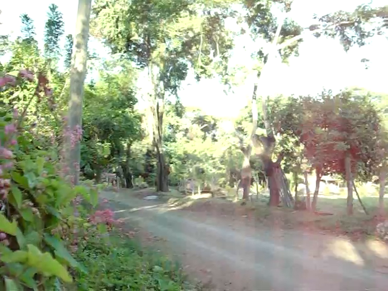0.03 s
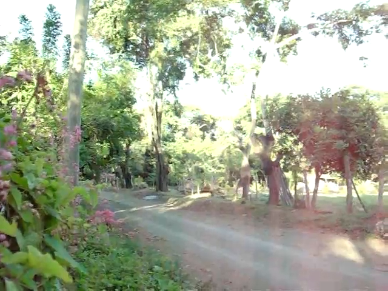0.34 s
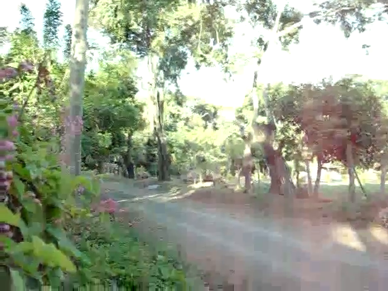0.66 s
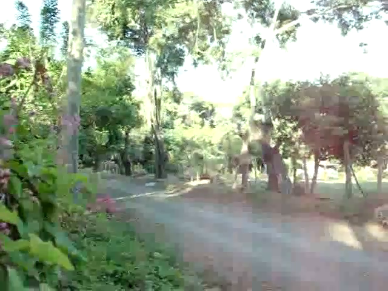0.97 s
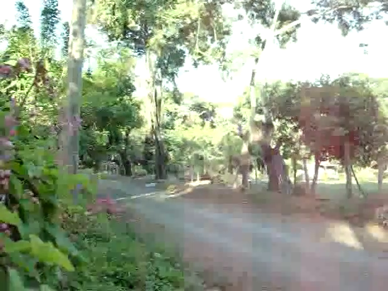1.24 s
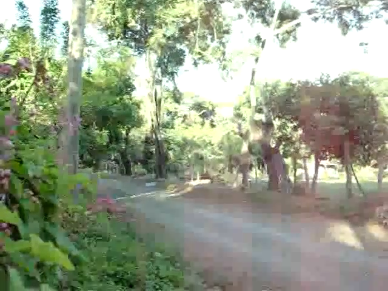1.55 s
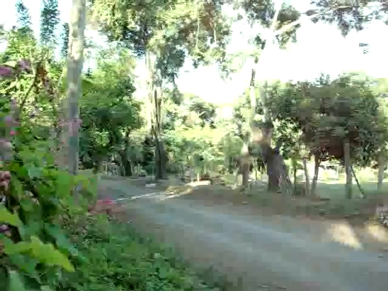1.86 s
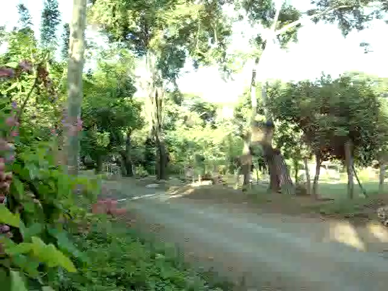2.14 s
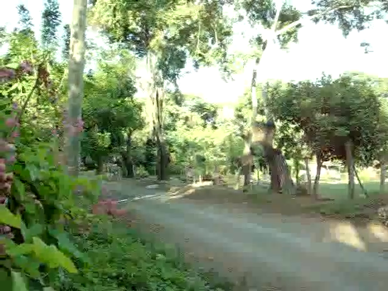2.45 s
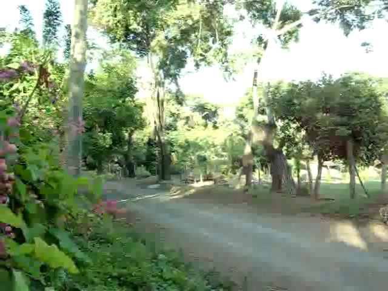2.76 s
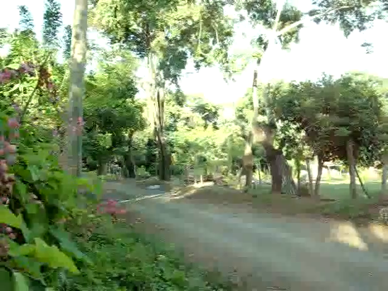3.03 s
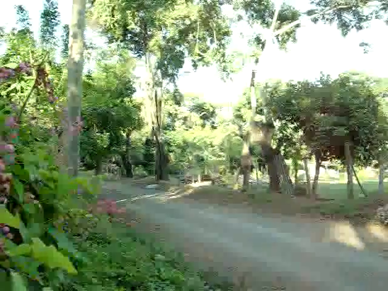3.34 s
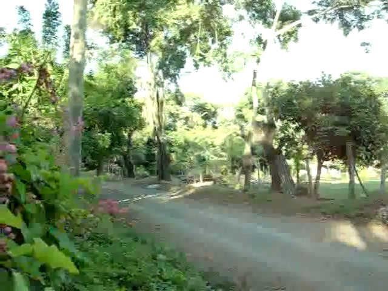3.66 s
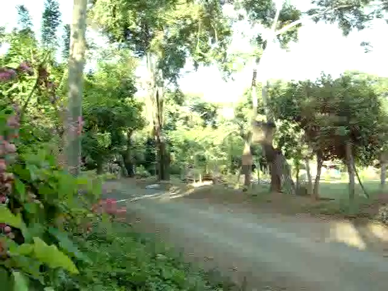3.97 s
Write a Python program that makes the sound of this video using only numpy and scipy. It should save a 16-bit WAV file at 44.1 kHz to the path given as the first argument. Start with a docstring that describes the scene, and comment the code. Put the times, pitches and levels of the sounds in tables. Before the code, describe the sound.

Howler monkeys roar far off in the forest from the start, rasping and pulsing, with short falling hoots near 0.5, 1 and 1.4 seconds, fading out by 2 seconds. Fingers click on the camera's case between 0.6 and 1 second, and one loud knock lands at 1.8 seconds. Low outdoor noise, a wavering hum and a faint whine and hiss continue until the end, around 4 seconds.

```python
"""Howler monkeys roar far off in the forest beside a dirt road: a rasp through gliding throat resonances,
with three falling hoots, sinking to a faint murmur by two seconds. Under it all lie the outdoor wash,
a wavering low hum, and the camera's own whine and hiss. From 0.6 s fingers knock and click on the
camera's case; its gain control ducks on the loud knocks and creeps back."""
import sys
import numpy as np
from scipy import signal
from scipy.fft import rfft, irfft
from scipy.io import wavfile
from scipy.ndimage import uniform_filter1d

SR = 44100
rng = np.random.default_rng(int(sys.argv[2]) if len(sys.argv) > 2 else 0)


def wav_record(signal):
    """Record a signal, one row per channel, as 16-bit PCM in the file named by sys.argv[1]."""
    frames = np.transpose(np.atleast_2d(signal))
    bounded = np.clip(frames, -1, 1)
    # unit amplitude maps onto the largest positive 16-bit level
    quanta = np.round(bounded * 32767).astype(np.int16)
    wavfile.write(sys.argv[1], SR, quanta)


N = 176400
T = np.arange(N) / SR
BIN_HZ = np.fft.rfftfreq(N, 1 / SR)


def amp(db):
    return 10 ** (np.asarray(db) / 20)


def unit(x):
    return x / np.sqrt(np.mean(x ** 2) + 1e-20)


def add(mix, start_s, sound):
    part = mix[round(start_s * SR):][:len(sound)]
    part += sound[:len(part)]


def fade(t, t60_s):
    return np.exp(-np.log(1000) * t / t60_s)


def phase(hz):
    return 2 * np.pi * np.cumsum(hz * np.ones(N)) / SR


def white():
    return rng.standard_normal(N)


def noise(spectrum):
    """Steady noise at unit level, shaped by (freq_hz, level_db) points."""
    hz, db = np.transpose(spectrum)
    shape_db = np.interp(np.log(BIN_HZ + 1), np.log(hz + 1), db)
    return unit(irfft(rfft(white()) * amp(shape_db), N))


def waver(hz, depth, rate_hz):
    """Phase of a pitch that wanders at random by the fraction depth, no faster than rate_hz."""
    drift = unit(irfft(rfft(white()) * (BIN_HZ < rate_hz), N))
    return phase(hz * (1 + depth * drift))


def resonate(x, hz, width_hz):
    """A steep resonance that follows the curve hz, at unit level."""
    carrier = np.exp(1j * phase(hz))
    pole = np.exp(-2 * np.pi * width_hz / SR)
    band = x / carrier
    for _ in range(3):  # three passes narrow the band to about width_hz
        band = signal.lfilter([1 - pole], [1, -pole], band)
    return unit((carrier * band).real)


def sustained(x, size=3000):
    """Keeps a sound's quick roughness but holds its loudness steady."""
    power = uniform_filter1d(uniform_filter1d(x ** 2, size), size)
    return x / np.sqrt(abs(power) + 1e-12)


def low_pass(x, hz):
    return signal.oaconvolve(x, signal.firwin(255, hz, window=("kaiser", 8), fs=SR), "same")


# The roar's two gliding resonances and its body: time_s, low_hz, high_hz, low_db, high_db, body_db
ROAR_CURVES = [(.05, 380, 830, -24.5, -21, -27.5), (.13, 390, 825, -25.5, -23.5, -23),
               (.21, 392, 785, -20.5, -17, -23), (.28, 385, 830, -25.5, -22.5, -25),
               (.40, 398, 805, -24.5, -21.5, -22), (.46, 400, 816, -37.5, -27, -28.5),
               (.53, 375, 804.7, -24, -29, -28.5), (.62, 375, 805, -30.5, -24, -23.5),
               (.705, 390, 812.3, -30, -27, -26.5), (.74, 390, 815, -24, -18, -29),
               (.82, 378, 765, -30.5, -29.5, -24), (0.902, 368, 730, -23, -24, -33),
               (.98, 410, 745, -36.5, -27, -26), (1.04, 398, 765, -21.5, -25.5, -25.5),
               (1.11, 415, 810, -33.5, -26.5, -27.5), (1.20, 405, 798, -26, -27, -29),
               (1.35, 402, 810, -28, -30, -29), (1.43, 440, 795, -38.5, -35.5, -36.5),
               (1.59, 440, 794.6, -40, -39.5, -39.5), (1.67, 425, 797, -31.5, -32.5, -36.5),
               (1.80, 418, 780, -33, -35.5, -41), (1.92, 415, 754, -50, -50.5, -43.5)]
# Weaker, still throat resonances that make the body: centre_hz, width_hz, relative_db
THROAT_BODY = [(475, 70, -6), (555, 90, -5), (660, 130, -7), (885, 110, -7), (1390, 100, -19)]


def roar():
    """Rasping puffs of air drive two gliding throat resonances, each with a wavering tone inside."""
    time_s, *curves = np.transpose(ROAR_CURVES)
    low_hz, high_hz, low_db, high_db, body_db = (np.interp(T, time_s, curve) for curve in curves)
    fold_flutter = waver(hz=45.8, depth=.193, rate_hz=40)
    puffs = ((1 + np.cos(fold_flutter)) / 2) ** 2
    breath = (.99 + puffs) * white()  # the puffs ride on a steady airflow
    low = resonate(breath, low_hz, width_hz=46.7)
    low += unit(np.sin(waver(low_hz, depth=.02, rate_hz=45)))
    high = resonate(breath, high_hz, width_hz=87)
    high += amp(-3) * unit(np.sin(waver(high_hz, depth=.02, rate_hz=46.4)))
    body = sum(amp(db) * resonate(white(), hz, width_hz) for hz, width_hz, db in THROAT_BODY)
    return amp(low_db) * sustained(low) + amp(high_db) * sustained(high) + amp(body_db) * body


def forest(calls, tails=4, t60_s=.3, wet_db=-12.5, cycle_hz=2):
    """A short forest reverb; several tails take turns so it adds no fixed colour."""
    t, wet = T[:SR // 2], 0
    for k in range(tails):
        tail = rng.standard_normal(len(t)) * fade(t, t60_s)
        send = np.maximum(np.cos(2 * np.pi * (cycle_hz * T + k / tails)), 0)
        wet += signal.fftconvolve(calls * send, tail / np.linalg.norm(tail))[:N]
    return calls + amp(wet_db) * wet


# Bass-heavy colour of the outdoor air: freq_hz, relative_db
WASH_SPECTRUM = [(20, -20), (45, -9), (70, 5), (130, 1), (200, 3), (300, -1.5), (500, -4), (800, -8),
                 (1150, -9.5), (1500, -12), (1900, -15.5), (3000, -19), (4500, -22.5), (6500, -60)]
# Its slow swell: time_s, relative_db
WASH_RIDE = [(0, 0.5), (1.4, 1.5), (2.2, 0), (2.8, 0.2), (3.35, 1), (4, -2)]


def outdoor_wash(level_db=-39.5, patch_db=1.08):
    """A low bed of noise that swells slowly, its colour shifting in soft patches."""
    frames = dict(nperseg=1024, noverlap=768)
    spectra = signal.stft(noise(WASH_SPECTRUM), **frames)[2]
    patches = uniform_filter1d(rng.standard_normal(spectra.shape), size=10, axis=0)  # across pitch
    patches = unit(uniform_filter1d(patches, size=14, axis=1))  # across time
    wash = unit(signal.istft(spectra * amp(patch_db * patches), **frames)[1][:N])
    swell_db = np.interp(T, *np.transpose(WASH_RIDE))
    return amp(level_db + swell_db) * wash


def hum(pitch_hz=99.65, tone_db=-42.5, blur_db=-49.5):
    """A wavering low tone inside a narrow blur of noise."""
    tone = unit(np.sin(waver(pitch_hz, depth=.015, rate_hz=6.5)))
    blur = resonate(white(), pitch_hz, width_hz=29)
    return amp(tone_db) * tone + amp(blur_db) * blur


# Tones of the camera's electronics, ahead of their band filter: pitch_hz, level_db
SCAN_TONES = [(2545, -48), (3670, -55)]
# Blurred tones beside them: pitch_hz, width_hz, level_db
BLURRED_TONES = [(4390, 11, -61), (4570, 20, -64), (500.2, 7.4, -52)]


def camera_whine(scan_hz=59.93, band_hz=(2000, 4200)):
    """The electronics sing in tones that restart with each picture scan, and a few blurred ones."""
    since_scan_s = T % (1 / scan_hz)
    tones = sum(amp(db) * unit(np.sin(2 * np.pi * hz * since_scan_s)) for hz, db in SCAN_TONES)
    band = signal.butter(4, band_hz, "bandpass", fs=SR, output="sos")
    blurs = sum(amp(db) * sustained(resonate(white(), hz, width_hz))
                for hz, width_hz, db in BLURRED_TONES)
    return signal.sosfilt(band, tones) + blurs


# Clear hoots within the roar: start_s, length_s, from_hz, to_hz, level_db
FALLING_HOOTS = [(.49, 0.091, 392, 347, -25.5), (0.997, 0.096, 430, 374.7, -25),
                 (1.439, .125, 520, 441, -27.5)]


def hoot(start_s, length_s, from_hz, to_hz, level_db, undertone_db=-15.5):
    """A nearly pure note with a weak undertone an octave below; it swells and slides down."""
    progress = np.clip((T - start_s) / length_s, 0, 1)
    glide = phase(from_hz + (to_hz - from_hz) * progress)
    swell = np.sqrt(abs(np.sin(np.pi * progress)))
    return amp(level_db) * swell * (np.sin(glide) + amp(undertone_db) * np.sin(glide / 2))


# Finger hits on the case, each with its balance of layers:
# start_s, contact_s, thump_hz, thump_db, clack_hz, clack_db, snap_db, ring_db, tilt_db_per_octave
FINGER_HITS = [(.6173, 0.00046, 743, -1, 1523, -4.5, -21, -30, -7),
               (0.627, 0.00054, 574, 5.5, 1350, -12, -6, -32, -5),
               (0.632, 0.00046, 815, -11.5, 1415, -2.5, -22, -24, 5),
               (.656, 0.00028, 807, -2.5, 1515, -14, -21, -42.5, -0.5),
               (.678, 0.0018, 813, 1, 1305, -5, -4, -42.5, -4),
               (.687, 0.0012, 422, 8.5, 1724, -4.5, 3.5, -38.5, 2.5),
               (0.7261, 0.00064, 787, 1, 1800, -2, -12, -22, -3.5),
               (.779, 0.0011, 700, -13, 1770, -7.5, 2, -22, -10),
               (.813, 0.00066, 800, -32, 1455, -14.5, -35, -52, -4.5),
               (.9335, 0.00061, 854, -10, 1742, -4.5, -5, -30, 24),
               (1.0002, 0.0013, 300, -14, 1250, -12.5, -15, -44, 0),
               (1.8154, 0.0053, 700, -11, 1360, 4.5, 9.5, -34, -6),
               (1.8198, 0.0029, 733, 15, 1250, -2, 6.5, -42, 0),
               (1.850, .0006, 600, -37, 1280, -24, -20, -53, 0)]
# Partials of the plastic clack: pitch_ratio, relative_db
PLASTIC_MODES = [(0.858, -4), (0.998, 2.5), (1.17, -8.5), (1.751, -9.5)]
# Colour of the snap: freq_hz, relative_db
SNAP_SPECTRUM = [(100, -10), (1000, 5), (2500, -2), (4200, 1.5), (5500, -12), (6800, -36), (8000, -57.5)]
# Longer ring of a small metal part: pitch_hz, relative_db, t60_s
METAL_MODES = [(1346, 5, 0.17), (1600, 0.5, .08), (1804, -4, 0.15), (1915, -6.5, 0.25), (2170, -15.5, .15),
               (2540, -23.5, 0.039)]


def knocks():
    """Each finger hit sets off a dull thump, a plastic clack, a noisy snap and a faint metal ring."""
    mix, t = np.zeros(N), T[:SR // 3]
    lowest_hz = METAL_MODES[0][0]

    def mode(hz, db, t60_s):
        return amp(db) * fade(t, t60_s) * np.sin(2 * np.pi * hz * t)

    for hit in FINGER_HITS:
        start_s, contact_s, thump_hz, thump_db, clack_hz, clack_db, snap_db, ring_db, tilt = hit
        thump = mode(thump_hz, thump_db, t60_s=.021)
        clack = sum(mode(ratio * clack_hz, clack_db + db, t60_s=.02) for ratio, db in PLASTIC_MODES)
        snap = amp(snap_db) * fade(t, t60_s=.016) * noise(SNAP_SPECTRUM)[:len(t)] / 2
        ring = sum(mode(hz, ring_db + db + tilt * np.log2(hz / lowest_hz), t60_s)
                   for hz, db, t60_s in METAL_MODES)
        attack = np.minimum(t / contact_s, 1)
        add(mix, start_s, -attack * (thump + clack + snap + ring))
    return mix


# Firm presses on the case: start_s, strength_db
FIRM_PRESSES = [(0.629, -24), (0.685, -16), (0.78, -23.5), (1.816, -4)]


def air_pushes(rise_s=.0087):
    """A firm press pushes air at the microphone in one soft, low pulse."""
    mix = np.zeros(N)
    age = T[:SR // 3] / rise_s
    pulse = -2 * age * np.exp(-age)
    for start_s, strength_db in FIRM_PRESSES:
        add(mix, start_s, amp(strength_db) * pulse)
    return mix


def gain_control(x, threshold_db=-10, window_s=.0056, recover_s=.27):
    """The camera ducks at once when the level passes its threshold, then creeps back."""
    power = uniform_filter1d(x ** 2, round(window_s * SR))
    over_db = np.maximum(10 * np.log10(abs(power) + 1e-12) - threshold_db, 0)
    release = np.exp(-T / recover_s)
    duck_db = np.maximum.accumulate(over_db / release) * release
    return x * amp(-duck_db)


def scene():
    """Distant calls and close handling over a bed of wash, hum and whine, in mono."""
    calls = forest(roar() + sum(hoot(*row) for row in FALLING_HOOTS))
    handling = knocks() + air_pushes()
    bed = outdoor_wash() + hum() + camera_whine()
    return (calls + handling + bed)[None]


# Colour of the camera's circuit hiss: freq_hz, relative_db
HISS_SPECTRUM = [(100, 4.5), (1000, -6), (2200, -1.5), (3200, -4.5), (4600, -2), (5500, -7.5), (6300, -18),
                 (6900, -33.5), (7400, -43)]


def record(dry, hiss_db=-53, start_s=.047, ceiling=.72):
    """The camera's chain: gain control, circuit hiss, a dull top and overload on the hardest knocks."""
    hissy = gain_control(dry[0]) + amp(hiss_db) * noise(HISS_SPECTRUM)
    dulled = low_pass(hissy * (T > start_s), hz=7200)
    clipped = np.clip(dulled, -ceiling, ceiling)
    return low_pass(clipped, hz=16000)[None]


dry = scene()
out = record(dry)
wav_record(out)
```